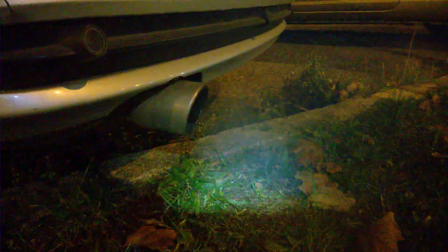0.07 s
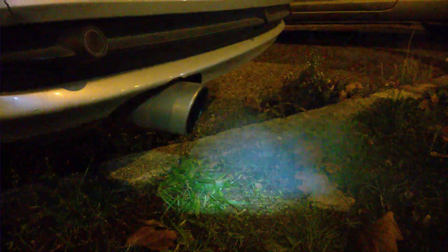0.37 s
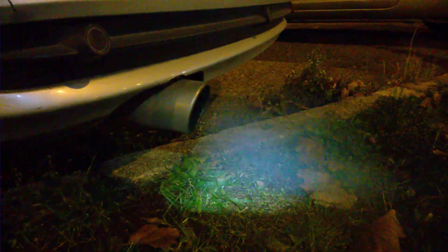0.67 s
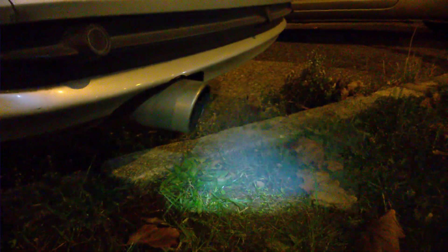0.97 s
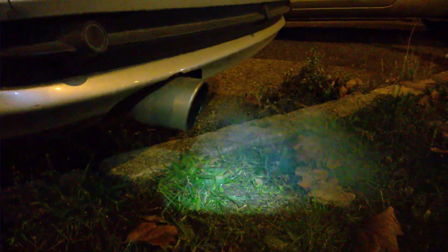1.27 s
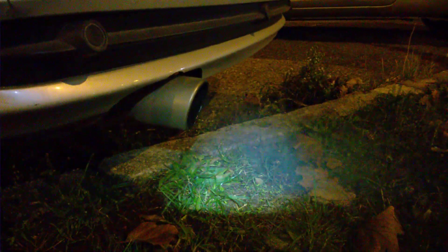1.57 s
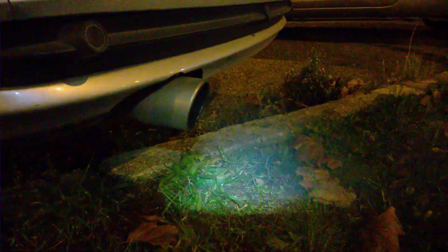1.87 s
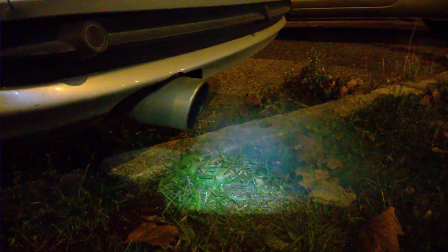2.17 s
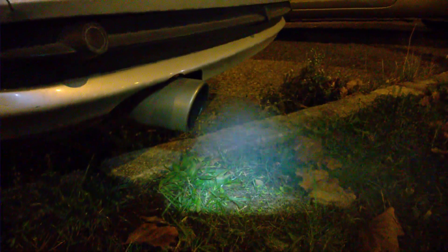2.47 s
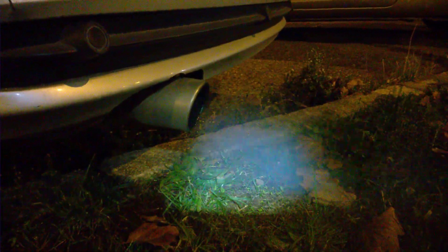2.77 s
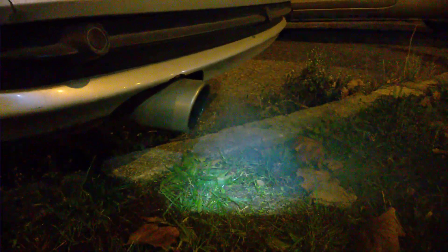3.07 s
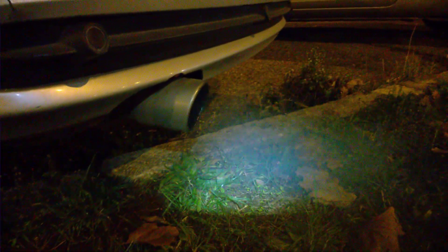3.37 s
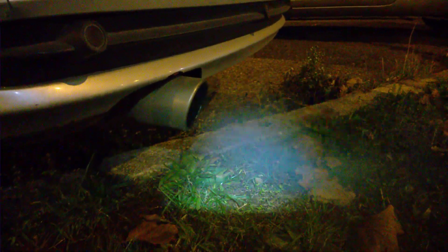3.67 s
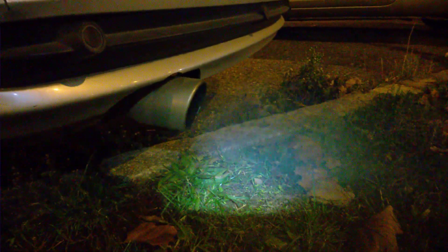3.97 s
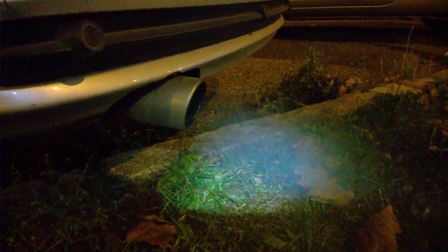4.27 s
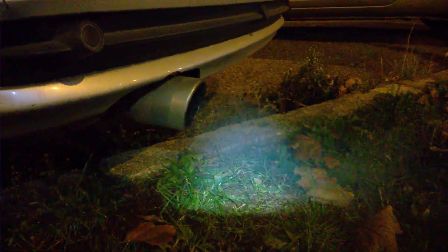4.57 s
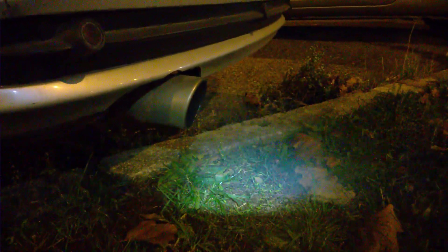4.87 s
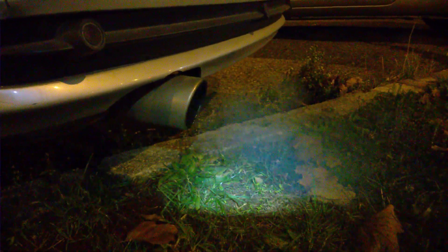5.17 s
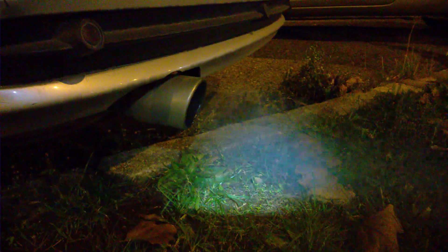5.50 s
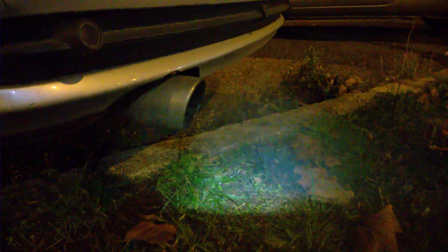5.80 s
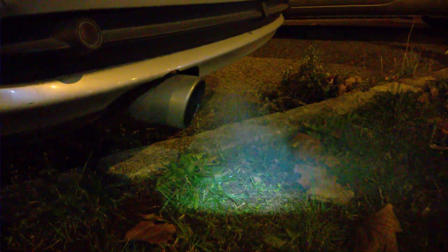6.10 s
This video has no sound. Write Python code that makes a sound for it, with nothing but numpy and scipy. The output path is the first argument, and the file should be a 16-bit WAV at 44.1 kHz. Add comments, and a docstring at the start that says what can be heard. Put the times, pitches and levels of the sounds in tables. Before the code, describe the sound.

After a brief silence, the sound of an idling four-cylinder car fades in between about 0.3 and 0.6 seconds, heard outdoors from close beside the tailpipe. A deep muffler throb dominates, its rapid pulses uneven in strength but regular in pattern. Over it, a sharp, hissing chuff repeats seven or eight times a second, like a leaking valve, with softer puffs, a steady rush of gas and a faint hollow hum from the pipe. The engine speed climbs slightly and sags back four times, peaking near 1.3, 2.7, 4.1 and 5.7 seconds. A small, dull burble comes from the exhaust at about 3.1 seconds and a fainter one near 5.9. The pipe's hum briefly swells twice just after 6 seconds, and the idle carries on to the end at about 6.5 seconds.

```python
"""Idling car, beside the tailpipe

A four-cylinder car idles outdoors, its speed drifting gently up and down; the sound fades in.
Every firing pushes a puff of gas through the muffler, which throbs while the pipe hisses and hums.
One cylinder seems to have a leaking valve: once a cycle it sucks gas back with a sharp, hissing chuff."""
import sys
import numpy as np
from scipy.fft import rfft, irfft, next_fast_len
from scipy.io import wavfile
from scipy.ndimage import map_coordinates

SR = 44100
rng = np.random.default_rng(int(sys.argv[2]) if len(sys.argv) > 2 else 0)


def log_audio(samples):
    """Write samples as a 16-bit WAV file to the path given in sys.argv[1]."""
    # one column per channel
    frames = np.atleast_2d(samples).T
    # limit to full scale, then quantise
    limited = np.clip(frames, -1, 1)
    pcm = np.round(limited * 32767).astype(np.int16)
    wavfile.write(sys.argv[1], SR, pcm)


N = 279594

# The cylinders in firing order: push_size, suck_back_size, valve_hiss_db, piston_hiss_db
CYLINDERS = [(1.08, 0.058, 2.5, -8), (1.15, 0.093, -11.5, -16), (1.25, 1.61, -2, 1), (0.88, 0.34, 0.5, -26)]


def throb(cycle):
    """Each cylinder pushes gas out, then sucks some back; both make the muffler ring."""
    # Low notes of the muffler and pipe: pitch_hz, width_hz, level_db
    muffler_notes = [(52.9, 18.4, 13.35), (51.9, 28.5, 12.78), (84.4, 36.9, -2.4), (156, 10, -20)]
    pressure = np.zeros(N)
    for k, (push, suck, _, _) in enumerate(CYLINDERS):
        opens = k / len(CYLINDERS)
        pressure += push * stroke(cycle, opens, width=0.018, scatter_db=0.35)
        pressure -= suck * stroke(cycle, opens + 0.106, width=0.011, scatter_db=0.3)

    def muffler(hz):
        # every second note is added upside down
        return sum((-1) ** k * amp(db) * resonance(hz, pitch, width)
                   for k, (pitch, width, db) in enumerate(muffler_notes))
    return filtered(pressure, muffler)


def puffs(cycle):
    """Gas hisses out twice per cylinder: as its valve opens, then as the piston sweeps it empty."""
    # Tone of a puff: pitch_hz, level_db
    puff_tone = [(60, 12.5), (180, -1), (300, -0.5), (500, -9.5), (850, 0), (1700, -9), (2400, -2),
                 (3600, -12.5), (6000, -9), (8500, -16), (11000, -30.5), (16000, -53)]
    power = np.zeros(N)
    for k, (_, _, valve_db, piston_db) in enumerate(CYLINDERS):
        opens = k / len(CYLINDERS)
        valve = amp(valve_db) * stroke(cycle, opens + 0.042, width=0.028, scatter_db=-2.5, lean=0.48)
        piston = amp(piston_db) * stroke(cycle, opens + 0.2, width=0.041, scatter_db=1.5, lean=0.26)
        power += valve ** 2 + piston ** 2
    flutter = amp(0.54 * wobble(400))
    return amp(-31.5) * gas_noise(np.sqrt(power) * flutter, puff_tone)


def chuff(cycle):
    """The leaking cylinder gives a bright hiss, with a weaker spit at the next firing."""
    # Tone of the leak: pitch_hz, level_db
    leak_tone = [(100, -21), (400, -4), (1000, -1), (1800, -6.5), (3500, -2), (5500, 1), (8300, -2),
                 (11000, -17.5), (13000, -28.5), (16000, -34)]
    jet = stroke(cycle, at=0.6655, width=0.033, scatter_db=0.5, lean=0.25)
    spit = amp(-11.5) * stroke(cycle, at=0.783, width=0.024, scatter_db=3.0, lean=0.39)
    flutter = amp(0.58 * wobble(500))
    return amp(-28) * gas_noise((jet + spit) * flutter, leak_tone)


def pipe_note(cycle):
    """The snap of the suck-back knocks the tailpipe's lowest note; passing gas keeps it humming."""
    # Moments when the note sings out: peak_s, level_db
    sings = [(6.085, -34), (6.22, -36.5)]
    snap = stroke(cycle, at=0.585, width=0.003, scatter_db=2.5)
    knock = amp(-14.5) * filtered(snap, lambda hz: resonance(hz, pitch_hz=324, width_hz=75) ** 2)
    hum = filtered(rng.standard_normal(N), lambda hz: resonance(hz, pitch_hz=326.3, width_hz=16.4) ** 2)
    swell_db = 4.5 * np.cos(2 * np.pi * (cycle - 0.81))  # louder after each gulp of the leak
    singing = sum(amp(db) * bump(peak_s, rise_s=0.024, fall_s=0.024) for peak_s, db in sings)
    return knock + (amp(-53 + swell_db) + singing) * hum / hum.std()


def flow(cycle):
    """Gas rushes on between the puffs, strongest just after the leaking cylinder's gulp."""
    # Tone of the rush: pitch_hz, level_db
    rush_tone = [(20, -29.5), (60, 12.5), (130, 10), (200, 0.5), (280, -4), (450, -10), (1000, -8.5),
                 (1700, -11.5), (2500, -17.5), (4000, -19), (8000, -23), (10500, -31), (13000, -43),
                 (16000, -42)]
    drift_db = 0.4 * wobble(3)
    swell_db = np.cos(2 * np.pi * (cycle - 0.82))
    flutter_db = 1.47 * wobble(90)
    return amp(-35.5) * gas_noise(amp(drift_db + swell_db + flutter_db), rush_tone)


def burbles():
    """Now and then the exhaust gives a dull little bubble of noise."""
    # The bubbles: peak_s, level_db
    bubbles = [(3.122, -18.5), (5.935, -29)]
    # Their tone: pitch_hz, level_db
    dull_tone = [(60, -6), (120, 2), (200, 4.5), (300, -19), (800, -39), (4000, -60)]
    swell = sum(amp(db) * bump(peak_s, rise_s=0.014, fall_s=0.014) for peak_s, db in bubbles)
    return amp(-7.5) * gas_noise(swell, dull_tone)


def crank():
    """Counts engine cycles (two turns each) while the speed climbs slowly and sags back faster."""
    # Surges in the idle speed: peak_s, extra_rpm
    surges = [(1.274, 34.3), (2.671, 29.8), (4.129, 34.8), (5.699, 35.7)]
    idle_rpm, start_cycle = 906.93, 0.0618
    rpm = idle_rpm + sum(extra * bump(peak_s, rise_s=0.38, fall_s=0.1946) for peak_s, extra in surges)
    return start_cycle + np.cumsum(rpm) / (2 * 60 * SR)


def stroke(cycle, at, width, scatter_db, lean=0):
    """One pulse per engine cycle, never quite the same size; at and width are in cycles."""
    position = cycle - at + 2.5
    sizes = amp(scatter_db * rng.standard_normal(size=64))
    from_peak = position % 1 - 0.5
    side_width = width * (1 + lean * np.sign(from_peak))  # lean: quicker rise, slower fall
    return sizes[position.astype(int)] * np.exp(-0.5 * (from_peak / side_width) ** 2)


def gas_noise(strength, tone):
    """Swirling gas makes noise that rings in the tailpipe; strength sets how loud it is."""
    # Pitches the pipe boosts, and one it dulls: pitch_hz, width_hz, boost_db
    pipe_peaks = [(322.5, 77, 12), (603, 114, 9.5), (855, 67, 13), (1118, 120, 7), (1197, 170, 4),
                  (1484, 71, 8.5), (2298, 500, 9.5), (2617, 70, 7), (2845, 230, -10), (3136, 590, 6.5),
                  (3920, 60, 7), (4554, 115, 6), (5535, 270, 6), (6440, 170, 4)]
    pitches_hz, levels_db = np.transpose(tone)

    def colour(hz):
        gas_db = np.interp(np.log(hz + 1), np.log(pitches_hz), levels_db)
        pipe_db = sum(db / (1 + (2 * (hz - pitch) / width) ** 2) for pitch, width, db in pipe_peaks)
        gain = amp(gas_db + pipe_db)
        return causal(gain / np.sqrt(np.mean(gain ** 2)))
    return filtered(strength * rng.standard_normal(N), colour)


def resonance(hz, pitch_hz, width_hz):
    """A filter that rings at one pitch; the narrower it is, the longer it rings."""
    return 1j * hz * width_hz / (pitch_hz ** 2 - hz ** 2 + 1j * hz * width_hz)


def filtered(x, response):
    """Passes x through a filter; response says what happens to each frequency."""
    size = 2 * next_fast_len((N + SR) // 2)
    hz = np.fft.rfftfreq(size, 1 / SR)
    return irfft(rfft(x, size) * response(hz), size)[:N]


def causal(gain):
    """A filter with this gain that rings only after a sound goes in, never before."""
    cepstrum = irfft(np.log(gain + 1e-7))
    half = len(cepstrum) // 2
    cepstrum[1:half] *= 2
    cepstrum[half + 1:] = 0
    return np.exp(rfft(cepstrum))


def bump(peak_s, rise_s, fall_s):
    """A bell-shaped swell that reaches 1 at peak_s."""
    since = np.arange(N) / SR - peak_s
    return np.exp(-0.5 * (since / np.where(since < 0, rise_s, fall_s)) ** 2)


def wobble(rate):
    """A smooth curve through random points, rate of them each second."""
    points = rng.standard_normal(int(N * rate / SR) + 4)
    return map_coordinates(points, [np.arange(N) * rate / SR])


def amp(db):
    """Turns decibels into a number to multiply by."""
    return 10 ** (np.asarray(db) / 20)


def scene():
    """Adds up the exhaust sounds; the crank times all but the burbles."""
    cycle = crank()
    return (throb(cycle) + puffs(cycle) + chuff(cycle) + pipe_note(cycle) + flow(cycle) + burbles())[None]


def record(dry):
    """The sound fades in after a short silence, and the very highest treble is cut off."""
    silence_s, fade_s, gain_db, top_hz = 0.27, 0.18, 0.55, 15750
    since = np.maximum(np.arange(N) / SR - silence_s, 0)
    fade = 1 - np.exp(-(since / fade_s) ** 2)
    return filtered(dry[0] * amp(gain_db) * fade, lambda hz: hz < top_hz)[None]


dry = scene()
out = record(dry)
log_audio(out)
```